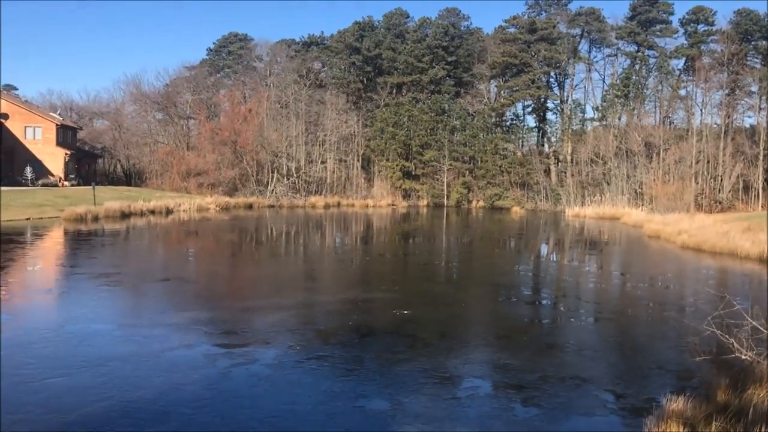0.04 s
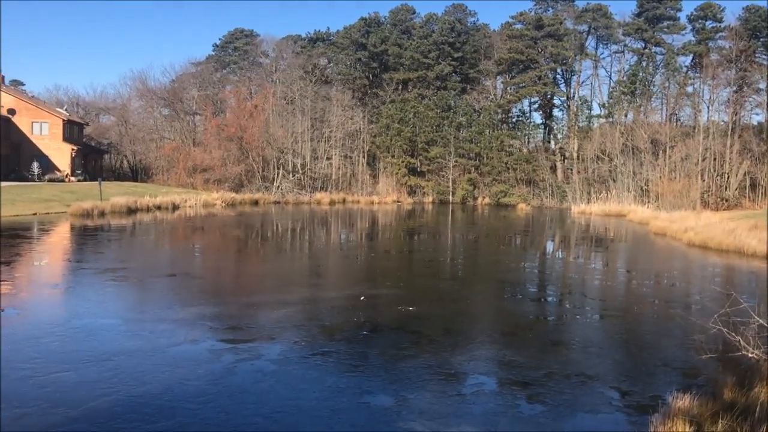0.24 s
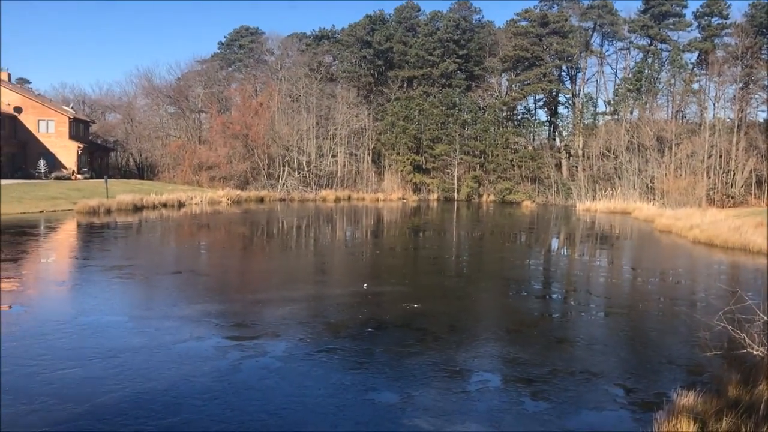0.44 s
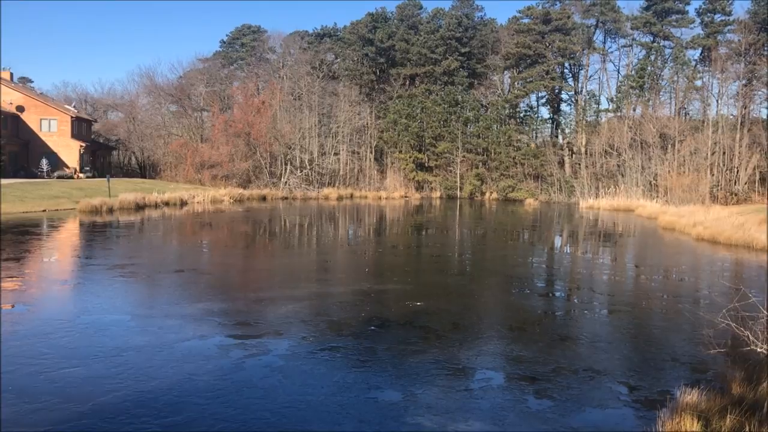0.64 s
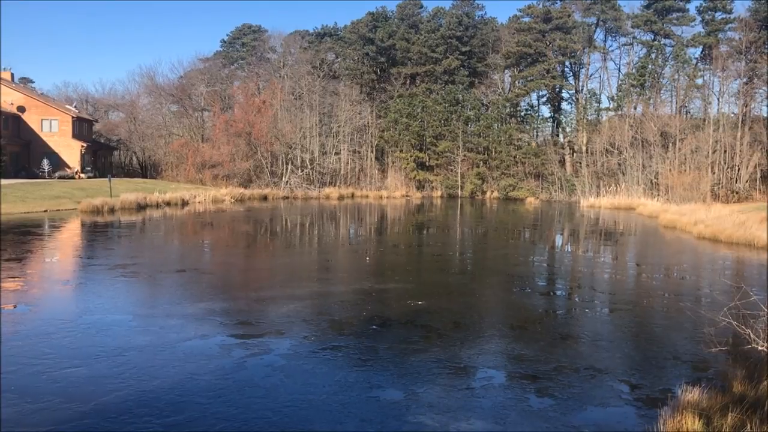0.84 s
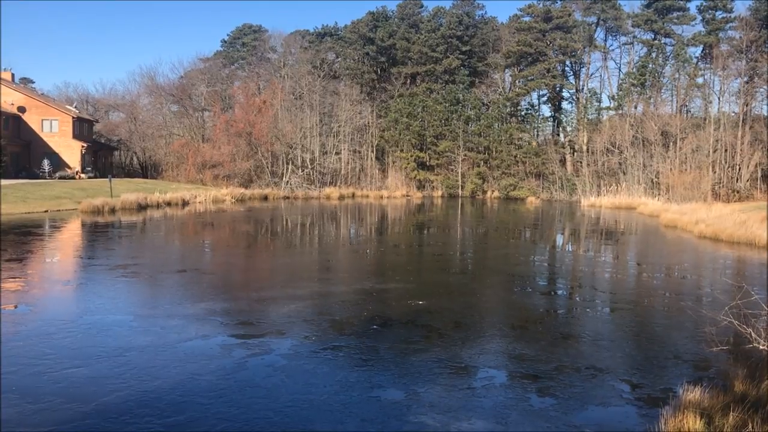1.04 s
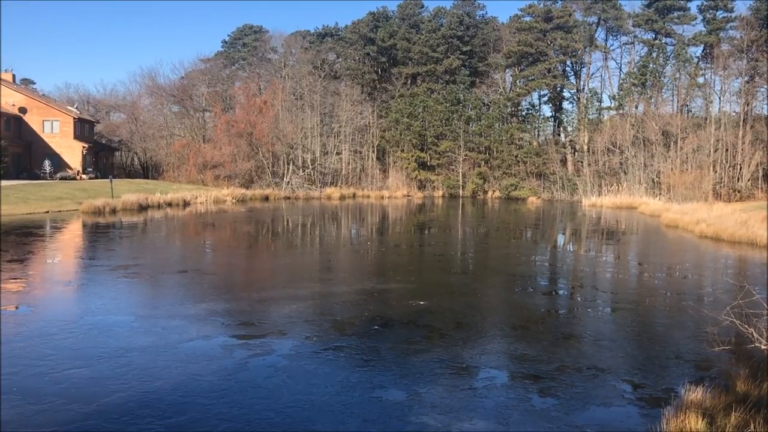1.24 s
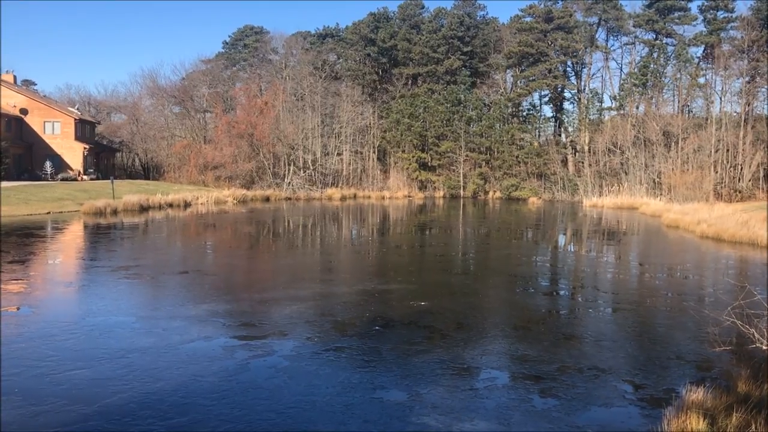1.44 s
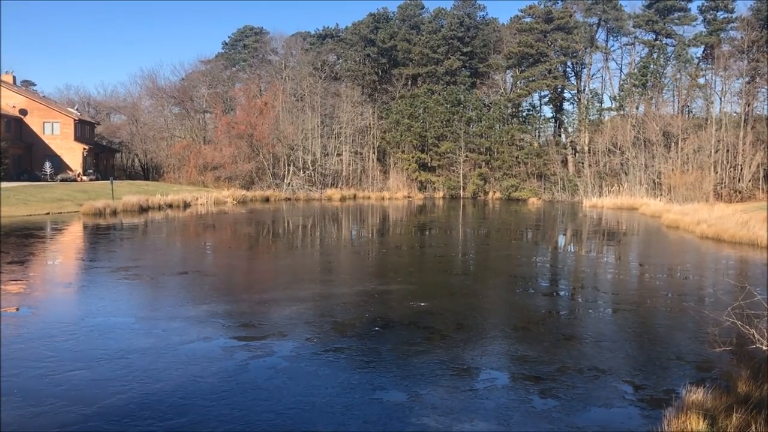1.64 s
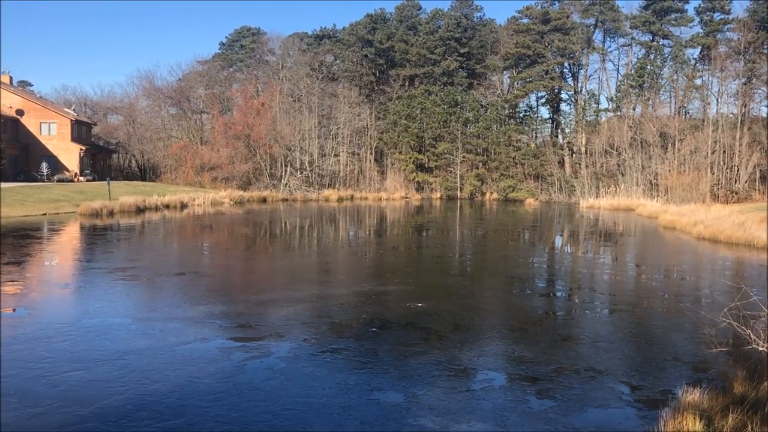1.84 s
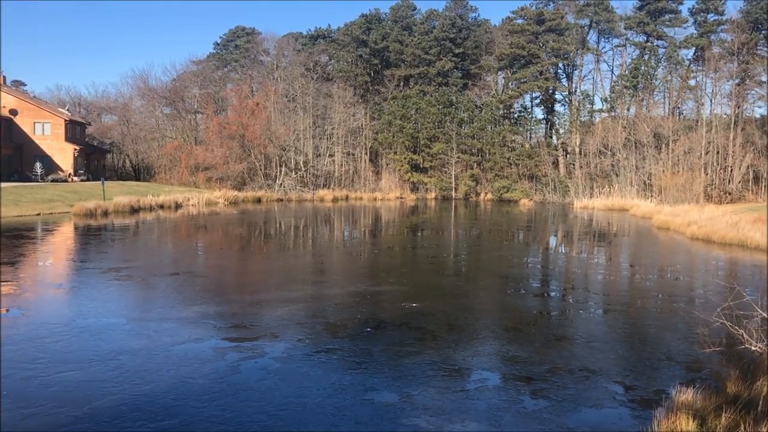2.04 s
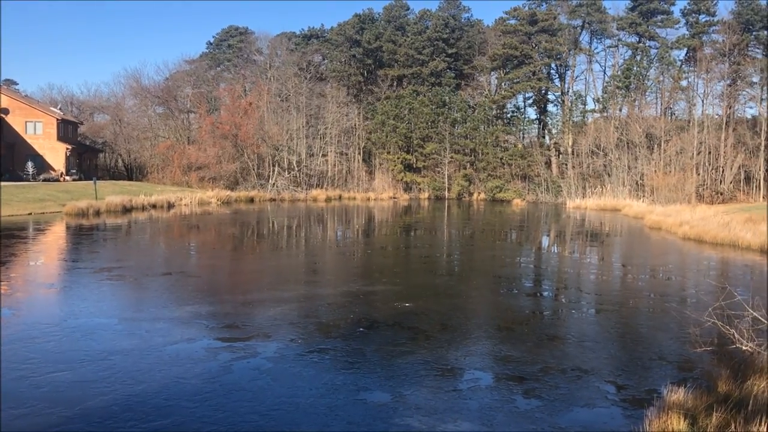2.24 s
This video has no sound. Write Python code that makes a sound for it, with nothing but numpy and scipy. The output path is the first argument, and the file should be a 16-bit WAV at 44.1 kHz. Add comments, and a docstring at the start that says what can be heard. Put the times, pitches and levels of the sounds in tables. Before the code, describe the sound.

A thrown rock cracks onto a frozen pond and skitters away with ringing chirps.

```python
"""A thrown rock cracks onto a frozen pond and skitters away in pieces. Every contact sends a bending
wave through the ice: a short chirp that dives to the sheet's own note and holds it for the time sound
needs to cross the air, so farther contacts ring longer. Crunches, clicks and pips add the bite, and
sliding grit hums on the same note. The woods echo over airy hiss, a low rumble and a distant motor."""
import sys
import numpy as np
from scipy import signal
from scipy.fft import rfft, irfft, next_fast_len
from scipy.io import wavfile
from scipy.ndimage import map_coordinates

SR = 44100
rng = np.random.default_rng(int(sys.argv[2]) if len(sys.argv) > 2 else 0)


def transcribe(signal):
    """Save signal, clipped to [-1, 1], as a 16-bit WAV file at the path in sys.argv[1]."""
    frames = np.atleast_2d(signal).T
    limited = np.clip(frames, -1, 1)
    pcm = np.round(limited * 32767).astype(np.int16)
    wavfile.write(sys.argv[1], SR, pcm)


N = 105840

# Tone colour of the outdoor air and of the fine grit (frequency [Hz], level [dB])
HISS_COLOUR = [(100, -15), (700, 7.5), (1500, 1), (2200, -3.5), (4000, -7), (7000, -13.5), (10000, -17.5),
               (16000, -19.5)]
NEAR_RING_S, LEAD_S = 0.01606, 0.003  # ring length of a near contact; lead-in of every chirp


def amp(db):
    return 10 ** (np.asarray(db) / 20)


def unit_rms(x):
    return x / np.sqrt(np.mean(x ** 2) + 1e-20)


def curve_at(points, hz):
    """Read (frequency, value) points along a log frequency axis."""
    freqs, values = np.transpose(points)
    return np.interp(np.log(hz + 1), np.log(freqs + 1), values)


def fader(points):
    """Gain per sample from (time [s], level [dB]) points."""
    return amp(np.interp(np.arange(N) / SR, *np.transpose(points)))


def wobble(per_s):
    """A smooth random curve with per_s knots a second."""
    knots = rng.standard_normal(int(N * per_s / SR) + 4)
    return map_coordinates(knots, [np.arange(N) * per_s / SR])


def filtered(x, response):
    """EQ x with a gain given as a function of frequency."""
    size = next_fast_len(N + SR // 2)
    return irfft(rfft(x, size) * response(np.fft.rfftfreq(size, 1 / SR)), size)[:N]


def noise(colour):
    """Coloured noise at rms 1."""
    return unit_rms(filtered(rng.standard_normal(N), lambda hz: amp(curve_at(colour, hz))))


def snap(colour, size=1024):
    """A sharp coloured pulse of peak 1."""
    cepstrum = irfft(np.log(amp(curve_at(colour, np.fft.rfftfreq(size, 1 / SR)))))
    cepstrum[1:size // 2] *= 2  # minimum phase packs the energy into the attack
    cepstrum[size // 2 + 1:] = 0
    pulse = irfft(np.exp(rfft(cepstrum)))
    return pulse / np.abs(pulse).max()


def add(track, start_s, sound):
    """Mix a sound into the track."""
    part = track[round(start_s * SR):][:len(sound)]
    part += sound[:len(part)]


def falling_sine(t, end_hz, sweep_hz, fall_s):
    """A tone that dives onto its final pitch."""
    hz = end_hz + sweep_hz * np.exp(-t / fall_s)
    return np.sin(2 * np.pi * np.cumsum(hz) / SR)


def scattered(grain, per_s, spread_db):
    """One grain sprinkled at random moments and sizes, at rms 1."""
    hits = (rng.random(N) < per_s / SR) * amp(spread_db * rng.standard_normal(N))
    polarity = rng.choice([-1, 1], N)
    return unit_rms(signal.fftconvolve(hits * polarity, grain)[:N])


def outdoors(flicker_db=1, waver_db=2.56, drift_rad=0.36):
    """The bed: flickering airy hiss, low rumble and the wavering hum of a distant motor."""
    # Partials of the motor (frequency [Hz], level [dB])
    motor_partials = [(59.5, -57.5), (118, -57)]
    # Fader rides of the hiss and the rumble (time [s], level [dB])
    hiss_ride = [(0, -59.5), (.21, -61), (.27, -61), (.45, -56), (.62, -56), (.72, -62), (1.0, -63),
                 (1.22, -66), (1.42, -60), (1.9, -59.5), (2.4, -64)]
    rumble_ride = [(0, -50.5), (1.2, -48), (2.4, -49)]
    # Tone colour of the rumble (frequency [Hz], level [dB])
    rumble_colour = [(15, -74), (28, -23), (42, -4), (62, 0), (87, -1.5), (120, -2.5), (160, -8),
                     (250, -8.5), (330, -12.5), (450, -18), (700, -28), (1500, -85)]
    motor, t = np.zeros(N), np.arange(N) / SR
    for hz, db in motor_partials:
        gain = amp(db + waver_db * wobble(7.6))
        motor += gain * np.sin(2 * np.pi * hz * t + drift_rad * wobble(4.12))
    hiss = fader(hiss_ride) * noise(HISS_COLOUR) * amp(flicker_db * wobble(80))
    rumble = fader(rumble_ride) * noise(rumble_colour)
    return hiss + rumble + motor


def woods_echo(x, send_db=-23):
    """The trees round the pond scatter back a thin, diffuse tail whose highs die first."""
    # Reverb time of the woods (frequency [Hz], time to fall 60 dB [s])
    decay_times = [(200, 1), (700, 0.99), (3000, 0.65), (8000, 0.66), (16000, 0.17)]
    hz, t, spectra = signal.stft(rng.standard_normal(SR), SR, nperseg=256)
    decay = amp(-60 * t / curve_at(decay_times, hz)[:, None])
    tail = signal.istft(spectra * decay, SR, nperseg=256)[1]
    return amp(send_db) * signal.fftconvolve(x, tail / np.linalg.norm(tail))[:N]


def sliding(flutter_db=3.5):
    """Sliding keeps the sheet humming unevenly, with faint chirps from chips and scratches of grit."""
    # Fader ride of the slide (time [s], level [dB])
    slide_ride = [(0, -99), (.225, -90), (.245, -32.5), (.30, -43.5), (.42, -48.5), (.53, -42.5),
                  (.63, -40.5), (.79, -49.5), (1.0, -54), (1.22, -44.5), (1.42, -55), (1.9, -47.5),
                  (2.06, -49), (2.13, -46), (2.18, -47), (2.4, -50)]
    # Resonance of the ice sheet (frequency [Hz], level [dB])
    sheet_colour = [(100, -26), (460, -17), (580, -14), (670, 1.5), (760, -9), (1000, -8.5), (1400, -18.5),
                    (2000, -33.5), (5000, -61)]
    hum = amp(-2.5) * unit_rms(noise(sheet_colour) * amp(flutter_db * wobble(60)))
    chatter = amp(-1) * scattered(bending_wave(NEAR_RING_S), per_s=130, spread_db=3.5)
    grit = amp(-14.5) * scattered(snap(HISS_COLOUR), per_s=1800, spread_db=0.5)
    return fader(slide_ride) * (hum + chatter + grit)


def pips(attack_s=0.0023):
    """Tiny falling pips, far above the note of the sheet."""
    # Pip cues (time [s], level [dB])
    cues = [(.1085, -53), (.493, -47.5), (0.578, -47), (1.149, -55.5)]
    out, t = np.zeros(N), np.arange(SR // 40) / SR
    envelope = t / attack_s * np.exp(1 - t / attack_s)
    pip = envelope * falling_sine(t, end_hz=2770, sweep_hz=2800, fall_s=0.0008)
    for start_s, db in cues:
        add(out, start_s, amp(db) * pip)
    return out


def stone_clicks(body_decay_s=0.0002, edge_decay_s=0.00067, splinter=0.42):
    """Stone ticks on ice, heard through the air: a pulse and splintering tail, layered body and edge."""
    # Click cues (time [s], body level [dB], edge level [dB])
    cues = [(0.6181, -27.5, -34), (.750, -65, -45), (.872, -58, -32.5), (0.9764, -58, -41.5),
            (1.084, -62, -37), (1.247, -39, -39), (1.364, -49, -43), (1.538, -50, -40.5), (1.552, -36, -47),
            (1.579, -42.5, -28), (1.743, -46, -50), (1.7621, -42, -37), (1.857, -44, -33),
            (1.954, -46, -41), (1.959, -40, -44), (2.120, -41.5, -35), (2.324, -42, -64)]
    # Tone colours of the body and the bright edge (frequency [Hz], level [dB])
    body_colour = [(200, -11), (700, -10), (1500, 2), (2200, -1), (3000, 4), (4000, -4), (5500, -10),
                   (7000, -30), (16000, -24)]
    edge_colour = [(500, -32), (4000, -22), (7000, 0), (9000, -0.5), (12500, 1), (16000, -2)]
    out, t = np.zeros(N), np.arange(SR // 100) / SR
    for start_s, body_db, edge_db in cues:
        layers = (body_db, body_colour, body_decay_s), (edge_db, edge_colour, edge_decay_s)
        for db, colour, decay_s in layers:
            tail = splinter * rng.standard_normal(len(t)) * np.exp(-t / decay_s)
            force = (t == 0) + tail
            add(out, start_s, amp(db) * np.convolve(force / np.linalg.norm(force), snap(colour)))
    return out


def ice_crunches():
    """The rock crushes the surface in short noise bursts around the first blow."""
    # Crunch cues (time [s], level [dB], decay [s])
    cues = [(0.2107, -30, 0.007), (0.2209, -31, 0.0053), (0.225, -30, 0.018), (0.241, -23.5, 0.0028),
            (0.2482, -33.5, 0.011)]
    # Tone colour of crushed ice (frequency [Hz], level [dB])
    crunch_colour = [(60, -14), (250, 5), (1200, 8.5), (2000, -12.5), (3700, -5), (4600, -12), (6500, -17),
                     (10000, -33), (16000, -37)]
    envelope, t = np.zeros(N), np.arange(N) / SR
    for start_s, db, decay_s in cues:
        envelope += amp(db) * (t >= start_s) * np.exp(-np.abs(t - start_s) / decay_s)
    return noise(crunch_colour) * envelope


def bending_wave(ring_s, ice_hz=657, sweep_hz=1075.3, sag_hz=22.6, radiate_hz=259, close_s=0.0023):
    """High bending waves outrun low ones; the note that travels as fast as sound in air holds, then stops."""
    t = np.arange(SR // 10) / SR - LEAD_S
    fall_s = 0.002239 * (ring_s / NEAR_RING_S) ** 0.36  # the dive slows with distance
    above_note_hz = sweep_hz * np.exp(-t / fall_s)
    swell = 1 + 0.093 * np.exp(-(t / fall_s - 2.4) ** 2)  # a small bloom on reaching the note
    onset = swell / (1 + (above_note_hz / radiate_hz) ** 2)  # pitches near the note radiate best
    lead_in = 0.04 * np.exp(-(t / LEAD_S * 2) ** 2)  # a sliver of the high start gets out anyway
    gate = 0.5 - 0.5 * np.tanh(2 * (t - ring_s) / close_s)
    detune = 1 + 0.011 * rng.uniform(-1.18, 1)
    note_hz = ice_hz * detune + sag_hz * (1 - t / ring_s)
    return (onset + lead_in) * gate * falling_sine(t, note_hz, sweep_hz, fall_s)


def ice_chirps(ripple_db=1.0):
    """Every bounce sends one chirp through the sheet, ringing a little unevenly."""
    # Contacts of rock on ice (time [s], ring length [s], level [dB])
    contacts = [(0.2245, 0.0175, -6.5), (0.2555, 0.0203, -31), (0.271, 0.0135, -29), (0.312, 0.0292, -28.5),
                (0.3405, 0.0165, -31.5), (0.373, 0.0193, -36), (0.3935, 0.021, -39), (0.4385, 0.018, -30),
                (0.4555, 0.014, -40.9), (0.478, 0.023, -35.5), (0.505, 0.013, -40.0),
                (0.5375, 0.015, -30.7), (0.563, 0.011, -42), (0.581, 0.0087, -42), (0.5945, 0.014, -27.0),
                (0.6045, 0.027, -25), (0.617, 0.012, -30), (0.628, 0.018, -32.5), (0.653, 0.028, -42),
                (0.691, 0.018, -39.6), (0.7155, 0.014, -30.5), (0.7225, 0.03, -29.5), (0.766, 0.019, -35),
                (0.8225, 0.019, -29.5), (0.8385, 0.019, -26), (0.847, 0.022, -29.5),
                (0.8965, 0.0175, -39.0), (0.9345, 0.034, -28.5), (1.03, 0.015, -33.5),
                (1.0495, 0.035, -31.5), (1.1075, 0.014, -28.5), (1.1225, 0.019, -29),
                (1.1395, 0.034, -35.5), (1.1835, 0.0165, -27.5), (1.2, 0.016, -30), (1.209, 0.041, -34),
                (1.2635, 0.019, -47), (1.29, 0.069, -38.5), (1.326, 0.0178, -32), (1.398, 0.016, -35),
                (1.455, 0.016, -36), (1.472, 0.018, -38), (1.497, 0.033, -34.5), (1.511, 0.047, -31.5),
                (1.5345, 0.044, -34.5), (1.588, 0.017, -37), (1.624, 0.016, -32.5), (1.6755, 0.0175, -40.3),
                (1.698, 0.019, -38), (1.705, 0.058, -32.5), (1.8075, 0.0515, -36), (1.877, 0.019, -32),
                (1.9025, 0.053, -34.5), (1.962, 0.021, -44), (2.065, 0.078, -40.5), (2.1115, 0.025, -30),
                (2.179, 0.076, -49), (2.267, 0.047, -47.5), (2.3485, 0.091, -38)]
    out = np.zeros(N)
    for start_s, ring_s, db in contacts:
        add(out, start_s - LEAD_S, amp(db) * bending_wave(ring_s))
    return out * amp(ripple_db * wobble(250))


def rock_crack(start_s=0.2408, db=-3, echo_s=0.00108, echo_db=-19):
    """The first blow's hard crack arrives through the air as its chirp ends, and slaps off the bank."""
    # Tone colour of the crack (frequency [Hz], level [dB])
    crack_colour = [(100, -10), (400, -8.5), (800, -8), (1400, -3), (2000, -1.5), (2600, 1), (3200, 2.5),
                    (4100, 3), (4800, -5), (5800, -5), (7000, -16), (9300, -6.5), (12000, -17),
                    (16000, -21)]
    crack = amp(db) * snap(crack_colour)
    out = np.zeros(N)
    add(out, start_s, -crack)
    add(out, start_s + echo_s, amp(echo_db) * crack)
    return out


def scene():
    """Mono mix: the rock on the ice, its echo and the outdoor bed."""
    rock = ice_chirps() + rock_crack() + stone_clicks() + ice_crunches() + pips() + sliding()
    return (rock + woods_echo(rock) + outdoors())[None]


def record(dry):
    """A steep high cut trims the very top of the treble."""
    top_hz, fade_hz = 16500, 900
    padded = [np.pad(x, (0, SR // 10), "reflect") for x in dry]
    return np.array([filtered(x, lambda hz: np.clip((top_hz - hz) / fade_hz, 0, 1)) for x in padded])


dry = scene()
out = record(dry)
transcribe(out)
```